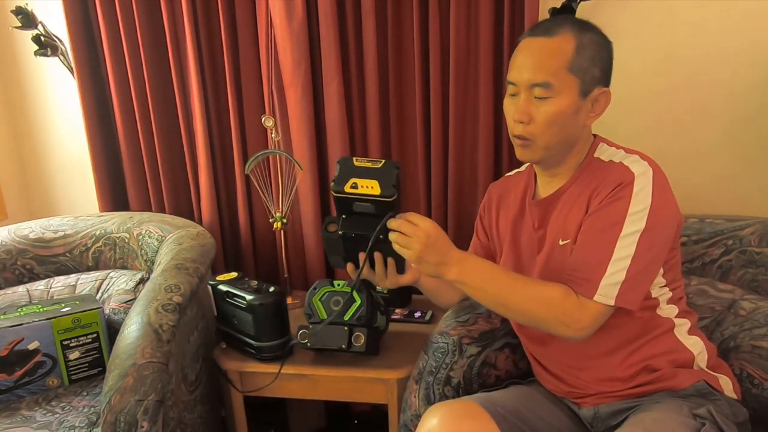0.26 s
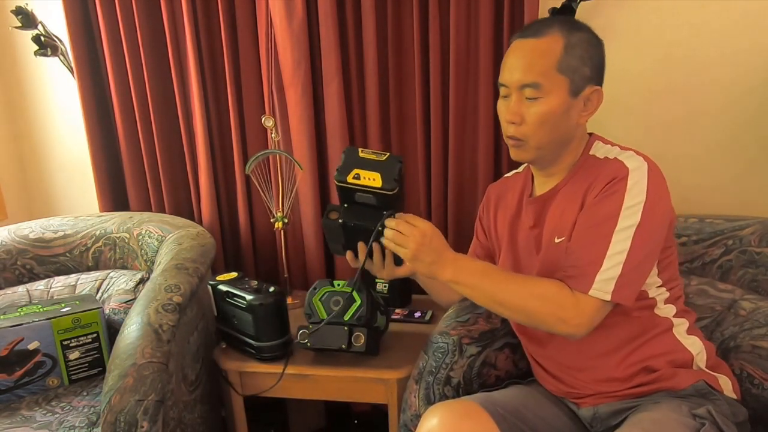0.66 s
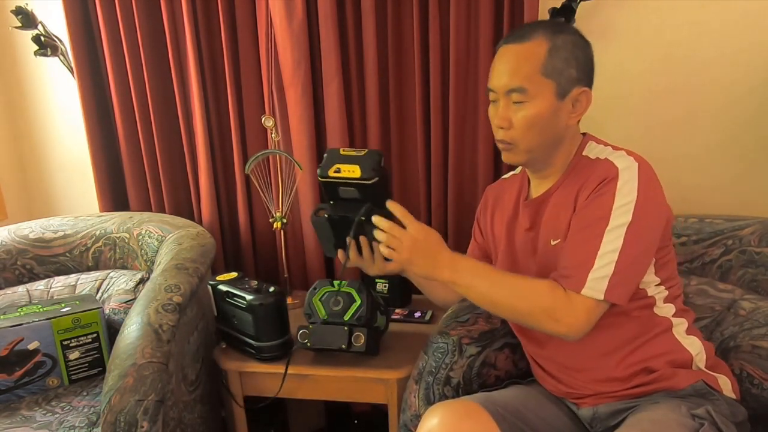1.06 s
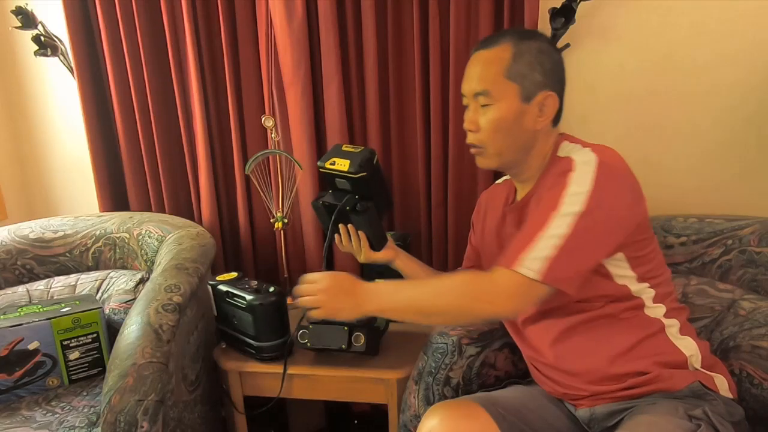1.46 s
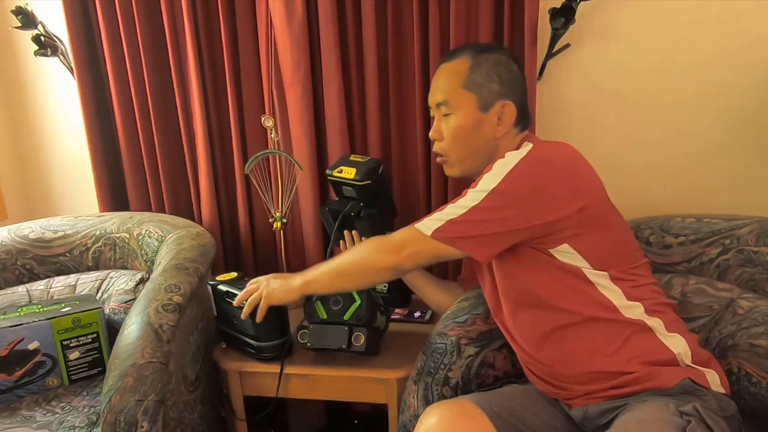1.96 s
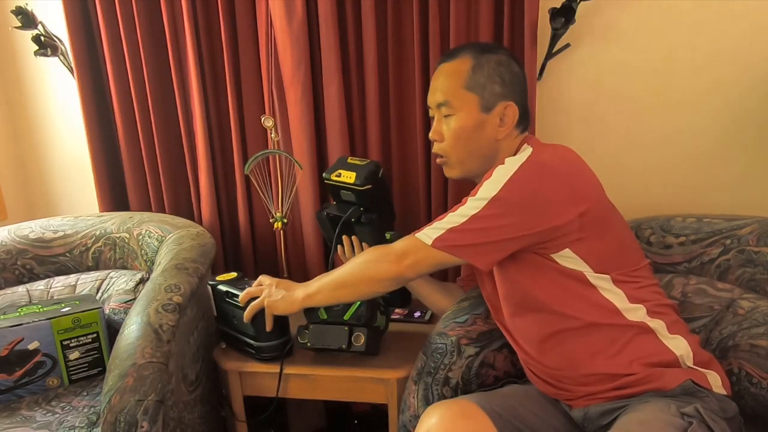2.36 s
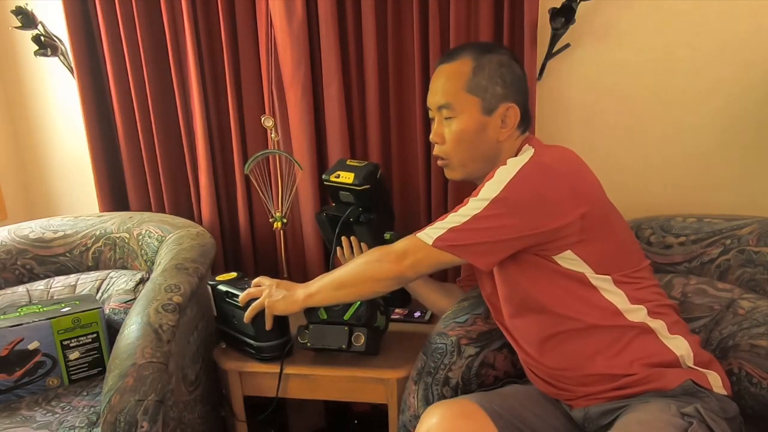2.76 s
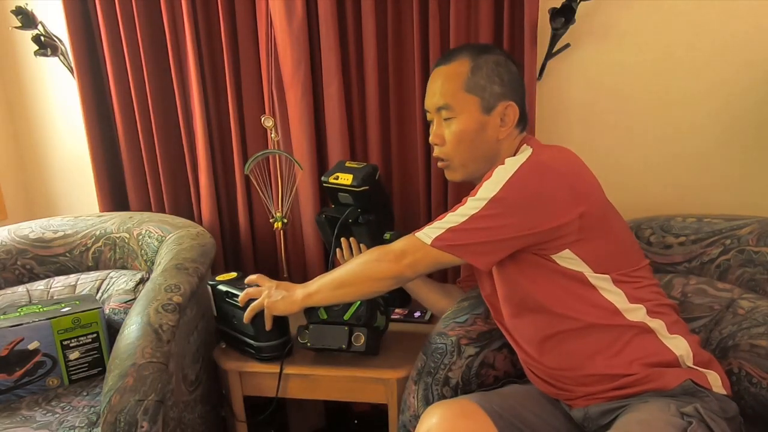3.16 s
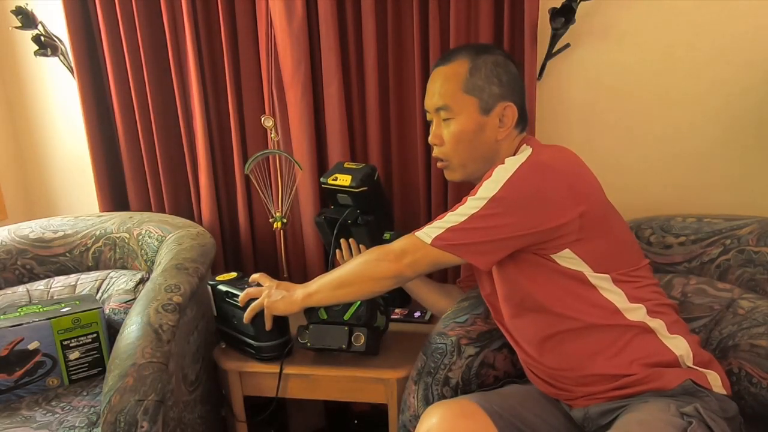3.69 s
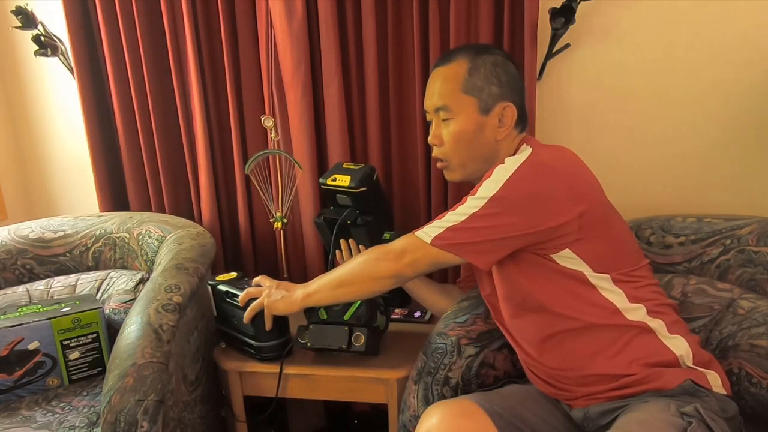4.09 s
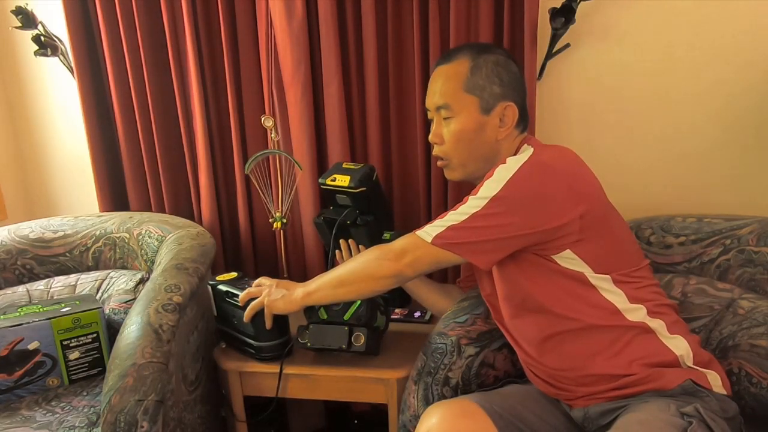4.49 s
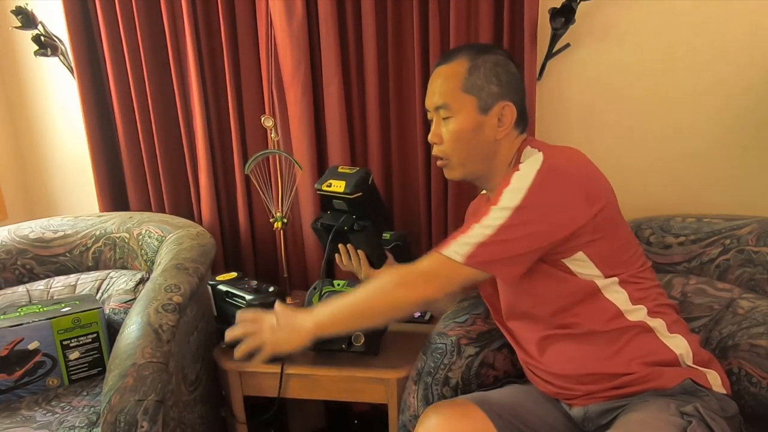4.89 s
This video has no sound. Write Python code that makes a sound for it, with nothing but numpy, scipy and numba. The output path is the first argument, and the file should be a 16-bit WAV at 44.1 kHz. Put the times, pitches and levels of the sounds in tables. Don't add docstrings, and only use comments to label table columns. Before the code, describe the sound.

A quiet furnished room carries a low ventilation hum and slight hiss, heard from about two metres. Around 0.3 to 0.4 s, fingers make small dry plastic taps; at 0.7 s a much louder, bright latch snap with fast rebounds leans left, with a brief ring. Faint skin brushes and tiny touches continue, with soft low table bumps, the firmest near 2.1 s. At 2.5 s a switch clicks, over a very faint high whirr. At about 2.8 s a small piston air pump starts abruptly, reaching full speed almost instantly: a loud, dense, rough buzz with low table shake, nasal gear whine, rattling teeth and hissing valves. Slightly compressed at its peaks, it masks the hum and stays nearly constant until 4.7 s. Then the whine drops away, pitch and level slide down, and separate hollow gulping strokes gasp and fade to about 5.1 s, with a short room tail.

```python
import sys
import numpy as np
from scipy import signal
from scipy.fft import rfft, irfft
from scipy.io import wavfile
from scipy.ndimage import uniform_filter1d
from numba import njit

SR = 44100
rng = np.random.default_rng(int(sys.argv[2]) if len(sys.argv) > 2 else 0)


def bounce(signal):
    frames = np.transpose(np.atleast_2d(signal))
    limited = np.clip(frames, -1, 1)
    pcm = np.round(limited * 32767).astype(np.int16)
    wavfile.write(sys.argv[1], SR, pcm)


def volts_from_decibels(level):
    exponent = np.asarray(level, float) / 20
    return 10 ** exponent


N = 226481
TIME = np.arange(N) / SR
ON_S, OFF_S = 2.77, 4.708
STEADY = slice(int(3.3 * SR), int(4.5 * SR))
FULL_SPEED = 59.7
SIDES = np.array([[1], [-1]])

# crank_multiple, level_db
STROKE_ORDERS = [(1, -10.5), (2, -16), (3, -13), (4, -1.5), (5, -13), (6, -7), (7, -5.5), (8, 2), (9, 6.5),
                 (10, -0.5), (11, -5.5), (12, -13), (13, -20), (14, -4.5), (15, -12), (16, -2.5),
                 (17, -1.5), (18, -5.5), (19, -11.5)]
# frequency_hz, density_db_per_hz
RATTLE_SPECTRUM = [(60, -11), (150, -17), (450, -14), (560, -6.5), (1050, -15), (1250, -11), (2400, -9.5),
                   (2950, -11), (3950, -8), (4150, -12.5), (6500, -16.5), (10200, -27), (11500, -31.5),
                   (15000, -42)]


def pump():
    speed = crank() * (1 + 0.000833 * walk(9))
    turn = 0.3 + np.cumsum(speed) / SR
    load = speed / FULL_SPEED
    body_db, gear_db, shake_db = effort()
    puffs = valve_puffs(turn)
    low_shell, high_shell = shell_modes(puffs)
    low = level(housing(turn, load), -2.55, STEADY) + level(low_shell, -23.5, STEADY)
    low += intake_pipe(puffs, load)
    high = level(tooth_rattle(turn), -7.5, STEADY) + level(colour(puffs, RATTLE_SPECTRUM), -2.16, STEADY)
    high += level(high_shell, -13.0, STEADY)
    air = volts_from_decibels(body_db - 1.0) * low + volts_from_decibels(gear_db - 1.0) * high
    whine = volts_from_decibels(gear_db) * level(gear_mesh(turn, load), -5.5, STEADY)
    shake = volts_from_decibels(shake_db) * level(table_shake(turn), -0.75, STEADY)
    return air, whine, shake


def crank():
    on, off = np.maximum(TIME - ON_S, 0), np.maximum(TIME - OFF_S, 0)
    kick_turns_s, spin_up_s, coast_s = 14, 0.055, 0.155
    top = FULL_SPEED + 0.045 * (3.7 - TIME)
    climb = top - (top - kick_turns_s) * np.exp(-on / spin_up_s)
    return (on > 0) * climb / (1 + off / coast_s)


def effort():
    run_db, silent_db = column(-8, -11, -24), column(-45, -33, -40)
    swell_s, swell_shape = column(0.016, 0.025, 0.066), column(1.1, 1.28, 3)
    coast_db_s, coast_db_s2 = column(23.5, 28.5, 41), column(5, 131, 102)
    # time_s, level_db, width_s
    gasps = [
        (4.89, -26, 0.0082),
        (5.02, -25, 0.012),
        (5.13, -24, 0.036),
    ]
    on, off = np.maximum(TIME - ON_S, 0), np.maximum(TIME - OFF_S, 0)
    db = run_db + silent_db * np.exp(-(on / swell_s) ** swell_shape)
    db = db - coast_db_s * off - coast_db_s2 * off ** 2
    body, gear, shake = np.where(TIME < ON_S, -120, db)
    stall = sum(dip_db * np.exp(-((TIME - s) / width) ** 2) for s, dip_db, width in gasps)
    overshoot_db = 8 * np.exp(-(on / 0.12) ** 2)
    return body + stall, gear, shake + overshoot_db


def column(*values):
    return np.array(values)[:, None]


def tone(turn, k, db, flutter_db, lag=0.):
    return volts_from_decibels(db + flutter_db * walk(14)) * np.sin(2 * np.pi * k * (turn - lag))


def housing(turn, load):
    # motor_shaft_multiple, level_db
    rotor = [
        (1, -20),
        (3, -5.5),
        (4, -39),
    ]
    order, order_db = np.transpose(STROKE_ORDERS)
    strokes = 0
    for k in range(3, 50):
        gain_db = np.interp(k * load, order, order_db, -40, -60)
        lag = 0.075 * rng.random() - 0.021 * k
        strokes = strokes + tone(turn, k, gain_db, flutter_db=1.0, lag=lag)
    spin = sum(tone(turn, k * 53 / 12, db, flutter_db=1.5) for k, db in rotor)
    return strokes * load ** 2.12 + spin * load ** 2.5


def gear_mesh(turn, load):
    # crank_multiple, level_db
    mesh_orders = [(42, -11), (48, -5), (50, -18.5), (52, -14), (53, 0), (54, 0), (55, -2.5), (56, -31),
                   (57, -21.5), (58, -10.5), (59, -4), (66, -4), (82, -28), (87, -34), (94, -13.5),
                   (105, -28), (106, -15), (110, -10.5)]
    tones = sum(tone(turn, k, db, flutter_db=1.0, lag=.1) for k, db in mesh_orders)
    return tones * load ** np.where(TIME > 3, .9, .2)


def tooth_rattle(turn):
    phase = np.linspace(0, 1, 740)
    old, new = (np.interp(turn % 1, phase, rng.standard_normal(740)) for _ in range(2))
    blend = 0.91 * walk(7)
    return colour(old * np.cos(blend) + new * np.sin(blend), RATTLE_SPECTRUM)


def valve_puffs(turn):
    gate = 1 + .8 * np.exp(-(turn % 1) / .3)
    return gate * volts_from_decibels(0.5 * walk(400)) * rng.standard_normal(N)


def shell_modes(puffs):
    # centre_hz, width_hz, level_db
    shell = [
        (536, 59, -6.5),
        (967, 750, 21),
        (3240, 1130, -3),
        (6050, 610, -14.5),
        (9800, 1450, -18),
    ]
    modes = [volts_from_decibels(db) * band(band(puffs, hz, w), hz, 1.2 * w) for hz, w, db in shell]
    return sum(modes[:2]), sum(modes[2:])


def intake_pipe(puffs, load):
    first = band(band(puffs, 535, 33), 526, 160)
    second = band(band(puffs, 600, 45), 603, 140)
    third = band(puffs, 996, 132)
    return level(first + 0.7 * second + 0.17 * third, -5.5) * np.clip(1 - load, 0, 1) ** 0.29


def table_shake(turn):
    half = SIDES / 2
    pan_db, lag_turns = 4.5, 0.072
    rock = tone(turn, *STROKE_ORDERS[0], flutter_db=2, lag=-lag_turns * half) * volts_from_decibels(pan_db * half)
    return rock + tone(turn, *STROKE_ORDERS[1], flutter_db=3.0)


def clicks():
    # (frequency_hz, density_db_per_hz)
    hose = [
        [(0.262, -28, 3), (0.298, -29.5, 0), (0.379, -27.5, 3), (0.419, -54, -3.5)],
        [(240, -41), (400, -15), (509, -4.5), (727, -10), (803, -20), (1440, -8), (1710, -8), (1860, -6.5), (2930, -16), (3150, -23), (4430, -17), (5180, -29.5), (10700, -50), (12000, -56), (15600, -88), (22000, -120)],
    ]
    latch = [
        [(0.698, -8, 6.5), (0.706, -13.5, 7), (0.715, -19, -2.5)],
        [(240, -46.5), (400, -17), (437, -32), (598, -8.5), (907, -24), (1310, -12.5), (1960, -2), (2490, 1.5), (2730, -7), (5570, -16.5), (7720, -10.5), (9650, -24), (11500, -41), (14000, -52)],
    ]
    switch = [
        [(2.485, -23, 5.1), (2.496, -31, 0.5), (2.519, -36, 1.5)],
        [(240, -42), (400, -16), (922, 2.5), (1070, -15), (1220, 2), (1540, -19), (1690, -9), (2370, -17), (2820, -18), (3450, -17), (10000, -45), (13000, -77), (22000, -120)],
    ]
    # time_s, peak_db, centre_hz, length_s
    touch_events = [(0.141, -43.5, 1910, 0.045), (0.218, -48, 1400, 0.033), (0.529, -41, 2090, 0.043),
                    (0.587, -43.5, 1800, 0.035), (0.658, -28, 2200, 0.37), (0.859, -31, 3830, .015),
                    (1.069, -48, 2460, 0.087), (1.117, -40, 1370, 0.052), (1.16, -54, 2800, 0.024),
                    (1.188, -65.5, 7700, .06), (1.346, -43, 745, 0.017), (1.47, -49.5, 2600, .05),
                    (1.624, -42, 885, 0.04), (2.005, -49, 5000, 0.22), (2.16, -54, 4500, 0.22),
                    (2.233, -53, 3600, .04)]
    # time_s, frequency_hz, level_db, t60_s
    ring_events = [(0.264, 2890, -50, 0.45), (.264, 4300, -58, 0.25), (.38, 2900, -50, .3),
                   (.39, 1410, -47, 0.32), (.264, 2050, -52, .2), (.7, 2545, -34, 0.35),
                   (.7, 3500, -32, 0.2), (.38, 5500, -52, .12), (.7, 1410, -33, .25),
                   (.7, 7600, -36.5, 0.33), (2.485, 920, -34, 0.085), (2.485, 2800, -48, 0.23)]
    noise = rng.standard_normal(N)
    touches, rings = 0, 0
    for s, db, hz, length in touch_events:
        brush = level(band(band(noise, hz, 0.41 * hz), hz, hz), db - 2)
        touches = touches + brush * fade(s, length, rise=0.75 * length ** 2)
    for s, hz, db, t60 in ring_events:
        mode = level(band(band(noise, hz, 0.075 * hz), hz, 0.64 * hz), db)
        rings = rings + mode * fade(s, t60)
    return knock(hose, t60=0.079) + knock(latch, t60=0.034) + knock(switch, t60=0.057) + touches + rings


def knock(part, t60):
    events, shape = part
    noise = level(colour(rng.standard_normal(N), shape), -4)
    return noise * sum(volts_from_decibels(db + pan_db * SIDES / 2) * fade(s, t60) for s, db, pan_db in events)


def bumps():
    # time_s, level_db
    thuds = [
        (.07, -72),
        (.8, -57),
        (.93, -58.5),
        (1.2, -57),
        (.66, -57),
        (2.055, -49),
        (2.12, -53),
    ]
    push = sum(volts_from_decibels(db) * np.exp(-((TIME - s) / 0.024) ** 2) for s, db in thuds)
    return push * level(band(band(band(rng.standard_normal(N), 65, 60), 65, 70), 65, 89), 3)


def hum():
    # frequency_hz, density_db_per_hz
    rumble = [(15, -65), (25, -25), (85, -19), (112, -21), (128, -15.5), (160, 3), (229, -3.5), (336, -16),
              (603, -29.5), (840, -22.5), (1080, -35.5), (1260, -32), (2450, -41.5), (7510, -47.5),
              (11000, -54), (14300, -87), (22000, -120)]
    mid, side = (colour(rng.standard_normal(N) * volts_from_decibels(1.0 * walk(23.74)), rumble) for _ in range(2))
    side = colour(side, [(20, -11.5), (90, -6), (150, -16.5), (400, -3), (1000, 8), (4000, -5), (20000, 3)])
    ticks = band(band(rng.standard_normal((2, N)), 7500, 900), 7500, 1200)
    ticks = ticks * volts_from_decibels(9.2 * walk(110) + 4 * walk(5.7))
    whirr = level(band(band(rng.standard_normal((2, N)), 7600, 1200), 7600, 1600), -71)
    whirr = whirr * ((TIME > 2.38) & (TIME < 2.78))
    return level(mid + side * SIDES, -44) + level(ticks, -72.5) + whirr


@njit
def walls(x, lags, gain, damp):
    line, soft, out = np.zeros((8, 4096)), np.zeros(8), np.zeros((2, len(x)))
    for i in range(len(x)):
        total = 0.
        for k in range(8):
            soft[k] += (1 - damp) * (gain[k] * line[k, (i - lags[k]) & 4095] - soft[k])
            total += soft[k]
            out[k % 2, i] += soft[k] * (1 - (k & 2))
        for k in range(8):
            line[k, i & 4095] = x[i] + soft[k] - total / 4
    return out


def room(send):
    t60_s, damping = 0.42, 0.17
    lags = np.array([613, 787, 941, 1103, 1361, 1597, 1873, 2213])
    echo = walls(send, lags, volts_from_decibels(-60 * lags / SR / t60_s), damping)
    side = colour(echo[0] - echo[1], [(20, -16), (250, -67), (700, -1.5), (1500, 1), (3000, -5),
                                      (8000, 4.0), (20000, 13.5)])
    return echo.mean(0) + side * SIDES


def level(x, db, part=slice(None)):
    return x * volts_from_decibels(db) / np.sqrt(np.mean(x[..., part] ** 2))


def colour(x, shape):
    hz, db = np.transpose(shape)
    f = np.fft.rfftfreq(N, 1 / SR) + 1
    return irfft(rfft(x) * volts_from_decibels(np.interp(np.log(f), np.log(hz), db, -90, -120)), N)


def band(x, hz, width):
    return signal.lfilter(*signal.iirpeak(hz, hz / width, SR), x)


def walk(rate):
    k = int(SR / rate)
    steps = np.repeat(rng.standard_normal(N // k + 1), k)
    return 1.31 * uniform_filter1d(uniform_filter1d(steps, k), k)[:N]


def fade(s, t60, rise=.0012):
    t = np.maximum(TIME - s, 0)
    return (1 - np.exp(-t / rise)) * 1000 ** (-t / t60)


def scene():
    air, whine, shake = pump()
    taps = clicks()
    pump_wet_db, click_wet_db = -12, -7
    send = volts_from_decibels(pump_wet_db) * (air + .3 * whine) + volts_from_decibels(click_wet_db) * taps.mean(0) + 1e-18
    direct = (air + whine) * volts_from_decibels(SIDES / 2) + volts_from_decibels(1.5) * shake
    duck = volts_from_decibels(np.interp(TIME, [2.76, 2.85], [0, -14]))
    return direct + taps + room(send) + duck * hum() + bumps()


def low_pass(x):
    return signal.sosfilt(signal.butter(12, 14970, fs=SR, output="sos"), x)


def record(dry):
    knee = .6
    size = np.abs(dry)
    rounded = np.sign(dry) * (knee + 0.58 * np.tanh((size - knee) / 0.59))
    return low_pass(np.where(size > knee, rounded, dry))


dry = scene()
out = record(dry)
bounce(out)
```